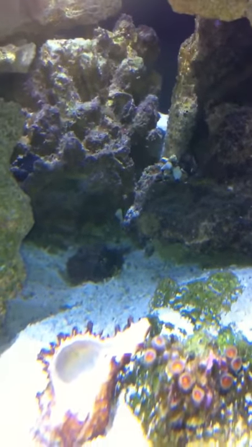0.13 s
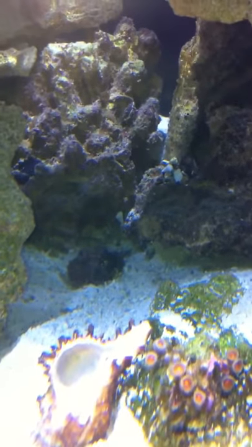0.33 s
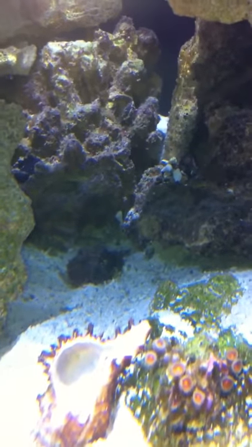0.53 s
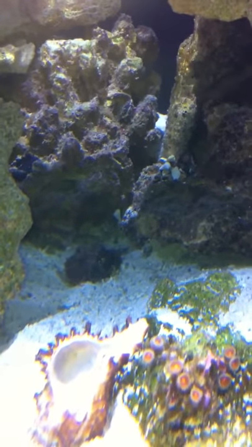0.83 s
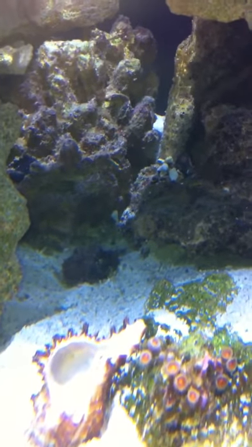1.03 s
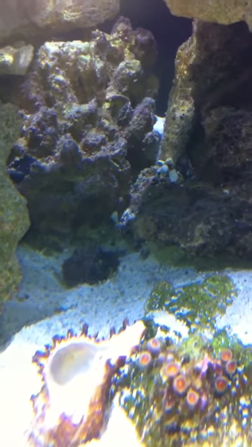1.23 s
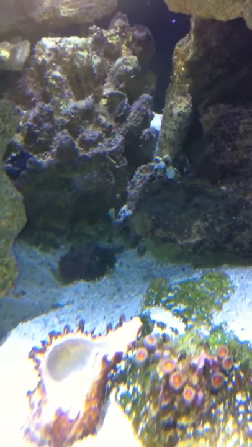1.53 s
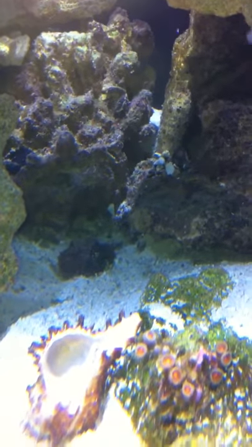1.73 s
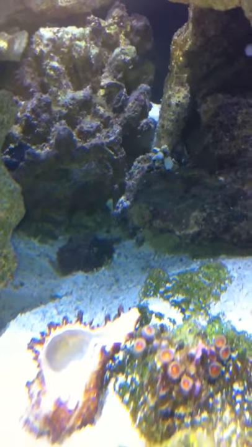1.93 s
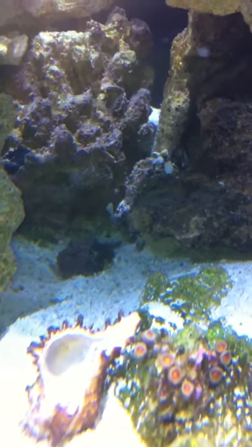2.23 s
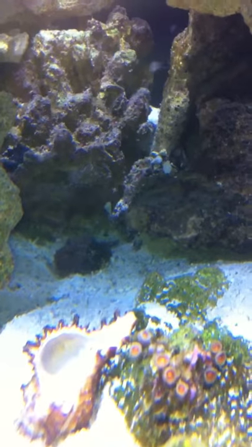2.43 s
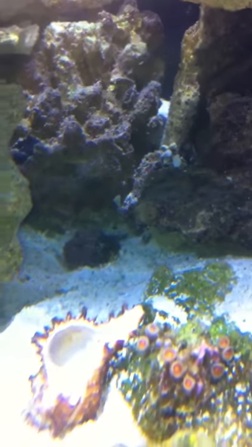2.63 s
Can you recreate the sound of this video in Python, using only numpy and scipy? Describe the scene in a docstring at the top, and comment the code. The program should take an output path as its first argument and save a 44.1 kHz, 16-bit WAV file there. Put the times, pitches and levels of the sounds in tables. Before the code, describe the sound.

A sharp snapping click with a brief bright crackle over a steady aquarium pump hum

```python
"""Indoors, by an aquarium: pumps hum on the mains over the steady rush of circulating water.
Sine tones make the hum, the whines and a thin whistle; shaped noise makes the rush; faint bubbles ping.
Near the end come small ticks, a short bright crackle of filtered impulses over a rasp of fine grains,
and one sharp snap with two fainter after-knocks, each a noise crack with ringing modes:
perhaps a snapping shrimp in the tank, perhaps a finger on the camera's case."""
import sys
import numpy as np
from scipy import signal
from scipy.fft import rfft, irfft
from scipy.io import wavfile
from scipy.ndimage import uniform_filter1d

SR = 44100
rng = np.random.default_rng(int(sys.argv[2]) if len(sys.argv) > 2 else 0)


def materialize(psi):
    """Save the field psi as 16-bit PCM at rate SR to the path in sys.argv[1].

    A 1-D psi becomes a single channel; in a 2-D psi each row is a channel.
    """
    bounded = np.clip(np.atleast_2d(psi).T, -1, 1)
    quanta = np.round(bounded * 32767).astype(np.int16)
    wavfile.write(sys.argv[1], SR, quanta)


N = 122598
ROOM_T60_S = 0.27  # tail behind the clicks and the snaps


def amp(db):
    """Decibels to gain."""
    return 10 ** (np.asarray(db) / 20)


def read(points, hz):
    """A spectrum's value, interpolated on a log-frequency axis."""
    f, value = np.transpose(points)
    return np.interp(np.log(hz + 1), np.log(f + 1), value)


def add(mix, s, sound):
    """Lays a sound into the mix at a time in seconds."""
    part = mix[round(s * SR):][:len(sound)]
    part += sound[:len(part)]


def wander(rate_hz):
    """Slow random motion of unit size: noise low-passed around a rate."""
    f = np.fft.rfftfreq(N, 1 / SR)
    lowpass = (f > 0) / (1 + (f / rate_hz) ** 4)
    x = irfft(rfft(rng.standard_normal(N)) * lowpass, N)
    return x / x.std()


def tone(hz, db):
    """A sine that follows a pitch and an rms level, from a random phase."""
    cycles = np.cumsum(hz) / SR + rng.random()
    return np.sqrt(2) * amp(db) * np.sin(2 * np.pi * cycles)


def burst(colour, t60, direct=1.1, size=2048):
    """An impulse and its fast-dying scatter through a causal (minimum-phase) colour filter."""
    t = np.arange(size) / SR
    log_gain = np.log(amp(read(colour, abs(np.fft.fftfreq(size, 1 / SR)))))
    response = np.fft.ifft(np.exp(np.conj(signal.hilbert(log_gain)))).real
    fade = amp(-60 * t / t60)
    scatter = rng.standard_normal(size) * fade
    impulse = direct * np.linalg.norm(fade) * (t == 0)
    x = signal.fftconvolve(scatter + impulse, response)[:size]
    # energy follows the fade, whatever the colour
    return .5 * x * np.linalg.norm(fade) / np.linalg.norm(x)


def room(x, wet_db, t60):
    """Adds a short diffuse tail of decaying noise, starting 2 ms behind the direct sound."""
    t = np.arange(SR // 2) / SR
    tail = rng.standard_normal(len(t)) * amp(-60 * t / t60) * (t > .002)
    return x + amp(wet_db) * signal.fftconvolve(x, tail / np.linalg.norm(tail))[:N]


# Pump hum: [multiple of the mains, rms level/dB]
HUM_HARMONICS = [(1, -85.5), (2, -72), (3, -61), (4, -55), (6, -64), (7, -69), (8, -59.5), (9, -66.5),
                 (10, -72.5), (12, -60), (14, -62.5), (20, -79.5), (25, -80), (31, -81), (39, -79),
                 (40, -79), (42, -94), (43, -75), (45, -87), (62, -88), (64, -94)]
# Tones of the rotors: [f/Hz, rms level/dB, pitch wander/Hz]
ROTOR_WHINES = [(115.15, -74.5, 0.33), (610.2, -65, 0.98), (1028, -73, 1.2), (1077.6, -60.5, 1.02),
                (1210, -72, 0.33), (1535, -73, 0.55), (1800, -76.5, 1.9), (2123, -76.5, 0.43)]
# Faint electronic whine: [f/Hz, rms level/dB, pitch wander/Hz]
ELECTRONIC_WHINES = [(14077, -84.5, 4), (14998, -91, 3)]
# Thin whistle that swells and fades: [t/s, f/Hz, level/dB before WHISTLE_DB]
WHISTLE_PATH = [(0, 2076, -76), (.48, 2078, -71), (.77, 2068, -62.5), (1, 2062, -68), (1.4, 2062, -66.5),
                (2.07, 2040, -77), (2.78, 2067, -75)]
MAINS_HZ, HUM_DRIFT_HZ = 60.02, 0.0094
HUM_WAVER_DB, HUM_WAVER_HZ = -0.08, 17
WHINE_WAVER_DB, WHINE_WAVER_HZ = -0.1, 6.5
WHISTLE_DB = -1


def pumps():
    """Mains harmonics on one pitch, free-running rotor tones, electronic whine and a thin whistle."""
    t = np.arange(N) / SR
    mains = MAINS_HZ + HUM_DRIFT_HZ * wander(3.4)
    out = np.zeros(N)
    for multiple, db in HUM_HARMONICS:
        out += tone(round(multiple) * mains, db + HUM_WAVER_DB * wander(HUM_WAVER_HZ))
    for hz, db, spread in [*ROTOR_WHINES, *ELECTRONIC_WHINES]:
        pitch = hz + spread * wander(WHINE_WAVER_HZ)
        out += tone(pitch, db + WHINE_WAVER_DB * wander(WHINE_WAVER_HZ))
    s, hz, db = np.transpose(WHISTLE_PATH)
    whistle_pitch = np.interp(t, s, hz) + 2 * wander(WHINE_WAVER_HZ)
    return out + tone(whistle_pitch, np.interp(t, s, db) + WHISTLE_DB)


# The snap and its after-knocks: [t/s, crack level/dB, ring level/dB]
SNAP_EVENTS = [(2.4019, -32.5, -39.5), (2.4073, -38, -48.5), (2.4348, -37, -58)]
# Colour of the crack: [f/Hz, relative level/dB]
CRACK_SPECTRUM = [(60, -55), (300, -16), (1200, -11), (2100, 11), (3000, 0), (3800, -5), (4800, -20),
                  (8000, -34), (16000, -36)]
# What the snap rings with: [f/Hz, relative level/dB, t60/s]
RING_MODES = [(1500, 0, 0.074), (2063, -1, 0.05), (2420, 1, 0.033), (2550, -6, 0.042), (3354, -1, 0.04),
              (3760, -5.5, 0.042), (3860, -11, .04), (4540, -24, 0.05)]
CRACK_T60_S, SNAP_WET_DB = 0.01, -12


def snaps():
    """Each is a short crack with the same few decaying modes ringing from its onset."""
    t = np.arange(SR // 5) / SR
    ring, out = np.zeros(len(t)), np.zeros(N)
    for k, (hz, db, t60) in enumerate(RING_MODES):
        # neighbouring modes start in opposite directions
        ring += (-1) ** k * amp(db - 60 * t / t60) * np.sin(2 * np.pi * hz * t)
    for s, crack_db, ring_db in SNAP_EVENTS:
        add(out, s, amp(crack_db) * burst(CRACK_SPECTRUM, CRACK_T60_S, direct=0.84))
        add(out, s, amp(ring_db) * ring / 2)
    return room(out, SNAP_WET_DB, ROOM_T60_S)


# Tiny bright ticks that crowd into a crackle: [t/s, level/dB before TICK_DB]
TICK_EVENTS = [(2.2525, -52), (2.2817, -47), (2.3113, -51), (2.3562, -36), (2.361, -40), (2.3637, -40),
               (2.3755, -54), (2.377, -37), (2.3797, -39), (2.384, -42), (2.387, -37), (2.3895, -39),
               (2.3912, -36), (2.3939, -35), (2.396, -41), (2.399, -38), (2.3998, -41), (2.4078, -37),
               (2.4108, -41), (2.413, -46), (2.4152, -46), (2.4173, -49), (2.4222, -55), (2.4869, -57)]
# Colour of a tick: [f/Hz, relative level/dB]
TICK_SPECTRUM = [(60, -52), (300, -10), (1500, -17), (4000, -2), (6000, -14), (8000, -18), (9500, -8),
                 (11800, 4), (13500, -0.5), (16000, -5.5)]
# Duller clicks around the crackle, ahead of the snap: [t/s, level/dB]
CLICK_EVENTS = [(2.3133, -36.5), (2.3152, -35), (2.3293, -46), (2.3375, -55), (2.3484, -51),
                (2.3559, -43.5)]
# Colour of a click: [f/Hz, relative level/dB]
CLICK_SPECTRUM = [(60, -57), (500, -11), (2300, -18), (3000, 1), (3900, 3), (5700, -9.5), (7000, -15),
                  (9000, -8.5), (11000, -17), (16000, -20)]
TICK_DB, TICK_T60_S = 3, 0.0034
TICK_WET_DB, TICK_ROOM_T60_S = -9, 0.13
CLICK_T60_S, CLICK_WET_DB = 0.0036, -7


def crackle():
    """Bright ticks and a few duller clicks, impulses with brief scatter and a little room."""
    ticks, clicks = np.zeros((2, N))
    for s, db in TICK_EVENTS:
        add(ticks, s, amp(db + TICK_DB) * burst(TICK_SPECTRUM, TICK_T60_S))
    for s, db in CLICK_EVENTS:
        add(clicks, s, amp(db) * burst(CLICK_SPECTRUM, CLICK_T60_S))
    return room(ticks, TICK_WET_DB, TICK_ROOM_T60_S) + room(clicks, CLICK_WET_DB, ROOM_T60_S)


# Fine rasp under the crackle, silent outside these times: [t/s, level/dB]
RASP_SWELL = [(2.372, -61), (2.386, -56), (2.397, -50), (2.412, -59.5), (2.44, -66)]
# Colour of the rasp: [f/Hz, relative level/dB]
RASP_SPECTRUM = [(60, -60), (600, 7), (1050, 8), (1800, -3), (2500, 0.5), (4500, -3.5), (5800, -16),
                 (6600, -4.5), (8000, -27), (11500, -9), (16000, -11)]
RASP_GRAINS_PER_S = 700


def rasp():
    """Dense tiny slips, random impulses coloured by a filter, that swell toward the snap and fade."""
    struck = rng.random(N) < RASP_GRAINS_PER_S / SR
    grains = rng.standard_normal(N) * struck
    gain = amp(read(RASP_SPECTRUM, np.fft.rfftfreq(N, 1 / SR)))
    x = irfft(rfft(grains) * gain, N)
    s, db = np.transpose(RASP_SWELL)
    level_db = np.interp(np.arange(N) / SR, s, db, left=-np.inf, right=-np.inf)
    return x / x.std() * amp(level_db)


# Faint clusters of bubbles in the water: [cluster t/s, centre f/Hz, level of one bubble/dB]
BUBBLE_CLUSTERS = [(.182, 4400, -57), (0.311, 3900, -52), (.585, 5800, -60), (.818, 3240, -54),
                   (2.179, 3950, -51), (2.362, 1030, -45.5), (2.574, 4500, -55), (2.735, 4480, -60)]
BUBBLE_RISE_S, BUBBLE_RING_CYCLES = 0.00027, 35  # cycles of the centre pitch in a 60 dB decay
CLUSTER_S, CLUSTER_PITCH_SPREAD = 0.016, 0.075  # spread as a fraction of the pitch
BUBBLE_WET_DB, BUBBLE_ROOM_T60_S = -1.5, 0.12


def bubbles(count=4):
    """A few tiny bubbles of unlike size ping in quick succession; low clusters ring longest."""
    t, out = np.arange(SR // 20) / SR, np.zeros(N)
    for s, hz, db in BUBBLE_CLUSTERS:
        shape = (1 - np.exp(-t / BUBBLE_RISE_S)) * amp(-60 * t * hz / BUBBLE_RING_CYCLES)
        for delay, detune in zip(rng.random(count), rng.standard_normal(count)):
            pitch = hz * (1 + CLUSTER_PITCH_SPREAD * detune)
            add(out, s + CLUSTER_S * delay, amp(db) * shape * np.sin(2 * np.pi * pitch * t))
    return room(out, BUBBLE_WET_DB, BUBBLE_ROOM_T60_S)


# Rush of water and air: [f/Hz, level/dB per Hz]
RUSH_SPECTRUM = [(30, -116), (60, -110), (100, -96.5), (150, -84.5), (200, -82.5), (250, -75.5),
                 (330, -78.5), (410, -76), (470, -82), (760, -86), (900, -83), (1100, -85), (1350, -92),
                 (2000, -93), (2600, -94), (3100, -99), (3350, -99), (4200, -102.3), (6500, -110.7),
                 (8500, -114.5), (16000, -114.5)]
RUSH_PATCH_DB, RUSH_SWELL_DB = 0.48, -0.22


def rush():
    """Steady flow noise with faint patches drifting over time and frequency."""
    hz = np.fft.rfftfreq(N, 1 / SR)
    noise = rng.standard_normal(N)
    x = irfft(rfft(noise) * amp(read(RUSH_SPECTRUM, hz)), N) * np.sqrt(SR / 2)
    z = signal.stft(x, nperseg=1024, noverlap=768)[2]
    patches = uniform_filter1d(rng.standard_normal(z.shape), size=14, axis=0)  # across frequency
    patches = uniform_filter1d(patches, size=12, axis=1)  # across time
    z = z * amp(RUSH_PATCH_DB * patches / patches.std())
    x = signal.istft(z, nperseg=1024, noverlap=768)[1][:N]
    return x * amp(RUSH_SWELL_DB * wander(1.3))


def scene():
    """The equipment's drone and faint bubbles, with the crackle, rasp and snaps on top."""
    return (pumps() + rush() + bubbles() + crackle() + rasp() + snaps())[None]


EDGE_HZ = 15760


def record(dry):
    """The recorder's band limit behind the microphone: a steep low-pass."""
    lowpass = signal.firwin(1023, EDGE_HZ, window=("kaiser", 9), fs=SR)
    return signal.oaconvolve(dry, lowpass[None], "same")


dry = scene()
out = record(dry)
materialize(out)
```